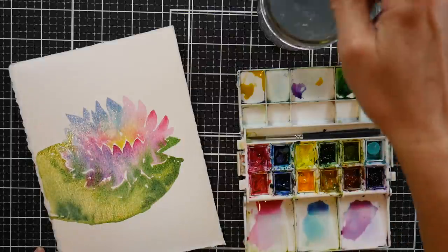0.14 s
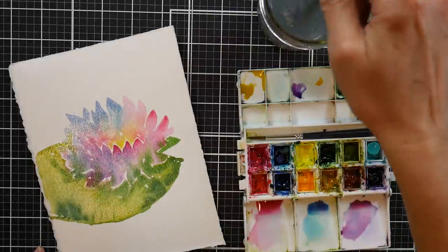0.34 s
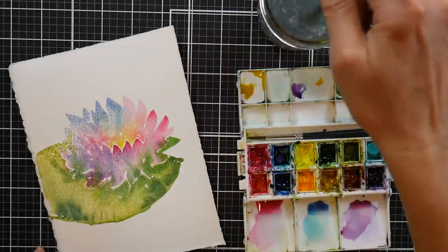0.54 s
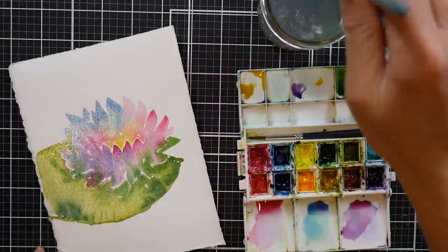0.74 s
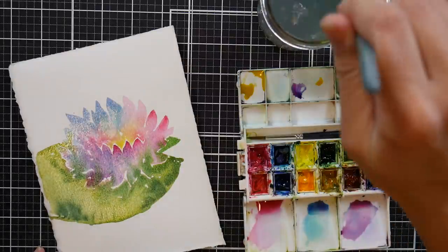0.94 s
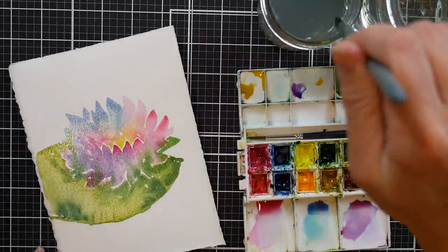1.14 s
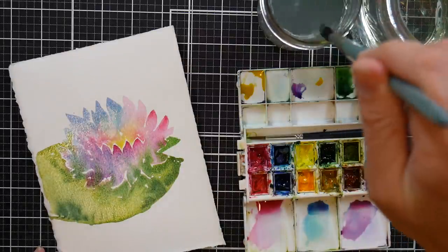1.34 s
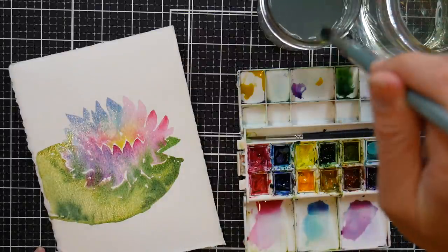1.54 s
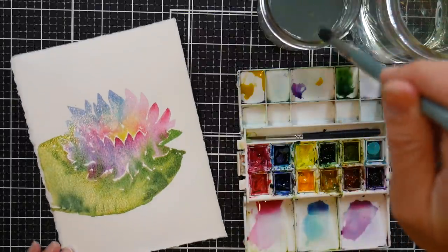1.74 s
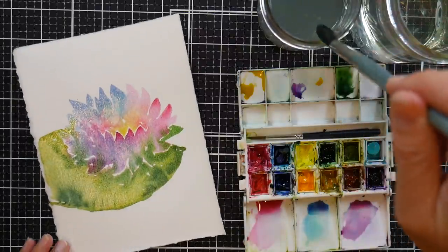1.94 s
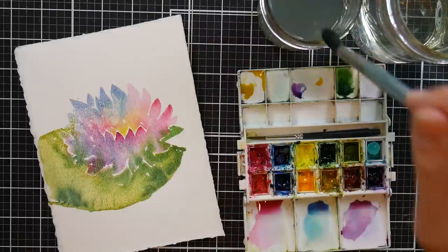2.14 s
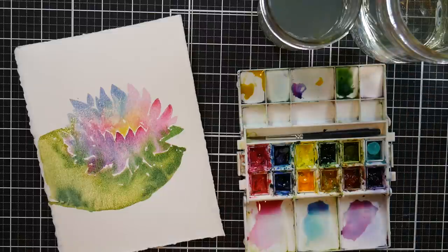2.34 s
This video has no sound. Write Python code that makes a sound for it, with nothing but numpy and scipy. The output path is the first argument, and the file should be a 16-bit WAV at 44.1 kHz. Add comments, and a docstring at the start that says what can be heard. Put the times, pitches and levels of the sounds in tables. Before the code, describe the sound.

A paintbrush is rinsed in a glass jar, splashing briefly and clinking against the sides. After one more clink, the handle clicks lightly on the rim and the wet bristles are softly wiped, close by in a small room.

```python
"""Rinsing a paintbrush in a jar

A brush is swished in a glass jar of water on an art table in a small room. It knocks about in the water, whips
up bubbles and drops, strikes the glass into its normal modes and shakes the table. Then the handle clicks
lightly on the rim, and the wet bristles hiss as they are wiped off four times."""
import sys
import numpy as np
from scipy import signal
from scipy.fft import rfft, irfft, next_fast_len
from scipy.io import wavfile
from scipy.ndimage import uniform_filter1d

SR = 44100
rng = np.random.default_rng(int(sys.argv[2]) if len(sys.argv) > 2 else 0)


def inscribe(sig):
    """Save sig as 16-bit PCM at rate SR to the path in sys.argv[1].

    A 1-D sig is mono; a 2-D sig holds one channel per row.
    Samples are clipped to [-1, 1] before scaling.
    """
    pcm = np.round(np.clip(np.atleast_2d(sig).T, -1, 1) * 32767)
    wavfile.write(sys.argv[1], SR, pcm.astype(np.int16))


N = 105487
TIME = np.arange(N) / SR
AGE = TIME[:SR // 2]  # seconds since an excitation
SHARP_ATTACK_S = 0.00015
# Strength of the stirring. Each row: time in seconds, level in dB.
STIRRING = [(0.04, -98), (0.075, -46.5), (0.2, -41.5), (0.3, -45), (0.4, -51), (0.5, -67), (0.68, -78),
            (0.8, -95.5)]


def from_db(db):
    """Decibels to amplitude ratio."""
    return 10 ** (np.asarray(db) / 20)


def rms_one(x):
    """Normalisation to unit rms."""
    return x / np.sqrt(np.mean(x ** 2) + 1e-20)


def at_hz(points, hz):
    """Interpolation on a logarithmic frequency axis."""
    frequencies, values = np.transpose(points)
    return np.interp(np.log(hz + 1), np.log(frequencies), values)


def add(out, start, sound):
    """Superposition of a sound from its start in seconds."""
    i = max(int(start * SR), 0)
    out[i:i + len(sound)] += sound[:N - i]


def fade(t60, size=len(AGE)):
    """Exponential decay by 60 dB in t60 seconds."""
    return np.exp(-np.log(1000) * AGE[:size] / t60)


def ping(hz, t60, attack_s, size=len(AGE)):
    """A damped oscillation with a smooth onset."""
    age = AGE[:size]
    onset = 1 - np.exp(-np.minimum(age / attack_s, 10) ** 2)
    return np.sin(2 * np.pi * hz * age) * fade(t60, size) * onset


def pings(rows, attack_s):
    """Superposition of damped oscillations, one for each row."""
    out = np.zeros(N)
    for start, hz, db, t60 in rows:
        add(out, start, from_db(db) * ping(hz, t60, attack_s, size=int(2 * t60 * SR)))
    return out


def burst(spectrum, t60, size=2048):
    """An impact transient: spectrally shaped noise in exponential decay."""
    gain = from_db(at_hz(spectrum, np.fft.rfftfreq(size, 1 / SR)))
    noise = irfft(rfft(rng.standard_normal(size)) * gain, size)
    return rms_one(noise) * fade(t60, size)


def wide_noise(spectrum, size):
    """Shaped stereo noise, partially coherent between the ears as a room's field is."""
    # Each row: frequency in Hz, left-right coherence.
    coherence = [(60, 0.2), (140, 0.3), (300, 0.1), (700, 0.13), (1400, 0.53), (2500, 0.84), (6000, 0.38),
                 (12000, 0.63)]
    n = next_fast_len(size)
    hz = np.fft.rfftfreq(n, 1 / SR)
    alike = np.clip(at_hz(coherence, hz), -.99, .99)
    mid, side = rfft(rng.standard_normal((2, n)))
    ears = np.sqrt(1 + alike) * mid + np.sqrt(1 - alike) * side * [[1], [-1]]
    return rms_one(irfft(ears * from_db(at_hz(spectrum, hz)), n)[:, :size])


def grain(depth_db, size):
    """Random amplitude modulation, smoothed over size samples."""
    flutter = rms_one(uniform_filter1d(rng.standard_normal(N), size))
    return rms_one(from_db(depth_db * flutter))


def room_tone():
    """Stationary background: broadband noise and a faint pure-tone hum."""
    # Each row: frequency in Hz, relative level in dB.
    spectrum = [(25, -27), (60, -14), (100, -12), (140, -9), (240, -5.5), (330, -16), (500, -11.5),
                (900, -17.5), (1600, -20), (3600, -25), (7300, -26), (12000, -29.5), (16000, -33)]
    noise_db, hum_db, hum_hz = -63.5, -74, 120
    hum = from_db(hum_db) * np.sin(2 * np.pi * hum_hz * TIME)
    return from_db(noise_db) * wide_noise(spectrum, N) + hum


def splashing():
    """Stirred water radiates fluttering noise whose envelope follows the stirring."""
    # Each row: frequency in Hz, relative level in dB.
    spectrum = [(40, -23.5), (120, -12), (270, -2.5), (480, -6.5), (670, 4), (850, -14.5), (1150, 10.5),
                (2400, 0.5), (3600, -16), (6300, -12), (10000, -15), (16000, -32)]
    envelope = from_db(np.interp(TIME, *np.transpose(STIRRING)))
    return envelope * grain(depth_db=6, size=130) * wide_noise(spectrum, N)


def bubbles():
    """Each bubble is a damped resonator; stronger stirring excites it more."""
    per_second, low_hz, high_hz, t60_cycles = 700, 1167, 10900, 18
    boost_db, db_per_octave, spread_db = 5, -7, 2
    times, levels = np.transpose(STIRRING)
    jitter, pitch, strength = rng.random((600, 3)).T
    start = times[0] + (np.arange(len(jitter)) + jitter) / per_second
    hz = low_hz * (high_hz / low_hz) ** pitch
    db = np.interp(start, times, levels) + boost_db + db_per_octave * np.log2(hz / low_hz)
    db += spread_db * np.minimum(-np.log(1 - strength), 2)
    rows = np.transpose([start, hz, db, t60_cycles / hz])
    return pings(rows[start < times[-1]], SHARP_ATTACK_S)


def droplets():
    """Each flying drop excites a brief, high damped oscillation."""
    # Each row: start in seconds, frequency in Hz, level in dB, t60 in seconds.
    drops = [(0.0437, 3240, -41.5, 0.03), (0.0437, 5960, -38.5, 0.023), (0.0445, 9800, -37.5, 0.0072),
             (0.065, 7100, -40, 0.022), (0.070, 5600, -28.5, 0.008), (0.1605, 6450, -42, 0.058),
             (0.183, 4550, -28, 0.006), (0.1912, 4540, -28, 0.015), (0.1915, 5800, -30.5, 0.011),
             (0.227, 5140, -36.5, .015), (0.229, 6110, -36.5, 0.019), (0.324, 3900, -52, 0.016),
             (0.434, 8500, -48, 0.0091), (0.5055, 9350, -42, 0.0034), (0.5305, 4970, -29.5, 0.0054),
             (0.5308, 6800, -29.5, 0.004), (0.5308, 10230, -39.5, 0.0049), (0.542, 4660, -39, 0.025),
             (0.6035, 6340, -41.5, 0.012), (0.6157, 10770, -35.5, 0.0046), (0.6157, 14600, -29.5, 0.001),
             (1.106, 8500, -47, 0.006), (1.110, 10900, -44, 0.0037), (2.001, 8500, -58, .03)]
    return pings(drops, SHARP_ATTACK_S)


def brush_knocks():
    """The brush excites hollow, quickly damped resonances of the water-filled jar."""
    # Each row: start in seconds, frequency in Hz, level in dB, t60 in seconds.
    knocks = [(0.064, 1096, -29.5, 0.072), (0.068, 2200, -9, 0.0039), (0.0790, 1930, 0, 0.0072),
              (0.0805, 1049, -33, 0.12), (0.084, 2136, -31.5, .16), (0.152, 2470, -28, 0.025),
              (0.1605, 2060, -20.5, 0.015), (0.1776, 1162, -23, 0.036), (0.1778, 1514, -16, .012),
              (0.178, 2680, -22, 0.0079), (0.189, 1141, -23.5, 0.054), (0.2448, 1816, -22, .014),
              (0.2596, 1830, -6, 0.015), (0.3225, 1640, -26.5, 0.026), (0.3228, 2870, -35, 0.028),
              (0.334, 2547, -33, 0.071), (0.324, 1144, -36, 0.056), (0.3435, 1690, -23.5, 0.026),
              (0.3586, 1525, -4, 0.013), (0.367, 1408, -20, 0.042), (0.392, 1400, -36.5, 0.049),
              (0.421, 1557, -36.5, 0.094), (0.5175, 2400, -38.5, 0.0096), (0.5206, 1974, -12, 0.0057),
              (0.531, 1633, -23.5, 0.016), (0.533, 1198, -43.5, .04), (0.7785, 1615, -31, .012),
              (0.7785, 3180, -31, 0.014)]
    return pings(knocks, attack_s=0.00077)


def glass_taps():
    """Impacts excite the jar's normal modes, weighted by where the brush lands."""
    # Each row: start in seconds, ring level in dB, relative levels in dB of the lowest mode,
    # the second mode and the free ring, then the level of the contact crack in dB.
    taps = [(0.0791, -20, -3, 2, -9.5, -22), (0.184, -38.5, 3.5, -5, -1, -61),
            (0.2439, -55, 0.5, 15, -18, -39.5), (0.2591, -29.5, -13, -1, -27, -29),
            (0.3580, -29.5, 7, -0.5, -15.5, -25.5), (0.450, -51.5, -8, -1, -6, -63),
            (0.7783, -24.5, 5, -12, -10.5, -31), (0.7819, -33.5, 8.5, -9, -10.5, -43.5),
            (0.8561, -57, 20, -4, -4.5, -60)]
    # Each row: frequency in Hz, level in dB, t60 in seconds.
    modes = [(2551.6, -5.5, 0.21), (5974, -7.5, .16), (6360, -5, 0.018), (8524, -6, .14),
             (10060, -16.5, 0.031), (10220, -15.5, .04), (11280, -19.5, .035)]
    # Each row: frequency in Hz, relative level in dB.
    crack_spectrum = [(50, -1.5), (150, 3), (400, 0.5), (750, -9), (1200, -1.5), (2600, 3.5), (4000, -10.5),
                      (6300, -19), (9500, -4.5), (12500, -22.5), (16000, -30)]
    contact_s = 0.0024  # the brush damps the first swing; the rest rings on
    out = np.zeros(N)
    lowest, second, *upper = [from_db(db) * ping(hz, t60, SHARP_ATTACK_S) for hz, db, t60 in modes]
    for start, db, lowest_db, second_db, free_db, crack_db in taps:
        ring = from_db(lowest_db) * lowest + from_db(second_db) * second + sum(upper)
        damping = np.exp(-AGE / contact_s) + from_db(free_db)
        add(out, start, from_db(db) * ring * damping)
        add(out, start, from_db(crack_db) * burst(crack_spectrum, t60=0.018))
    return out


def table_thuds():
    """The table top is a soundboard: each push on the jar excites low modes and a rumble."""
    # Each row: start in seconds, level in dB.
    pushes = [(0.081, -40.5), (0.185, -49.5), (0.26, -39.5), (0.366, -52), (0.444, -51.5), (0.548, -59.5),
              (0.791, -56), (1.19, -53), (1.79, -55), (2.172, -56.5)]
    # Each row: frequency in Hz, level in dB, t60 in seconds.
    modes = [(135, 4.5, 0.065), (146.2, 18.5, 0.1), (245, -5.5, 0.087)]
    # Each row: frequency in Hz, relative level in dB.
    rumble_spectrum = [(30, -26.5), (80, -15), (140, 0), (180, -5.5), (260, 0), (330, -3.5), (500, -5),
                       (800, -24), (3000, -57.5)]
    out = np.zeros((2, N))
    boom = sum(from_db(db) * ping(hz, t60, attack_s=0.025) for hz, db, t60 in modes)
    envelope = from_db(-3) * fade(t60=0.24) * (1 - np.exp(-AGE / .004))
    for start, db in pushes:
        rumble = envelope * wide_noise(rumble_spectrum, len(AGE))
        for ear, shake in zip(out, rumble):
            add(ear, start, from_db(db) * (boom + shake))
    return out


def handle_clicks():
    """Impact on the rim: a bright tick, then the damped modes of the hand-held handle."""
    # Each row: start in seconds, level in dB, the tick's offset in dB.
    clicks = [(0.7918, -29.5, 0), (1.0428, -46, -7.5), (1.0719, -34, -4), (1.1823, -32.5, -2),
              (1.2979, -33.5, -17), (1.3225, -30, 0.5), (1.3675, -42, -9), (1.3967, -32.5, -0.5),
              (1.5220, -36.5, -18.5), (1.5465, -30, 1.5), (1.6201, -35.5, -1.5), (1.7200, -45, -11),
              (1.7501, -36, 1.5), (1.8467, -38.5, -1), (1.9139, -44.5, -12), (1.9463, -38.5, -8),
              (2.0295, -38, -15), (2.101, -42, -8), (2.1297, -33.5, -2)]
    # Each row: frequency in Hz, level in dB, t60 in seconds.
    modes = [(249.3, -32.5, 0.22), (432, -24.5, 0.012), (956, -4.5, 0.0046), (1315, 8.5, 0.0038),
             (2220, -26.5, 0.0017)]
    # Each row: frequency in Hz, relative level in dB.
    tick_spectrum = [(300, -21.5), (2200, 4.5), (2900, -2.5), (3500, 0.5), (4200, -9.5), (4800, -1.5),
                     (5300, -4), (6100, 3), (6800, -8.5), (7500, -10.5), (8400, -6), (11000, -11),
                     (16000, -32)]
    body_lag_s, tick_db = 0.00039, -12.5
    out = np.zeros(N)
    body = sum(from_db(db) * ping(hz, t60, attack_s=0.00027) for hz, db, t60 in modes)
    for start, db, treble_db in clicks:
        add(out, start + body_lag_s, from_db(db) * body)
        add(out, start, from_db(db + treble_db + tick_db) * burst(tick_spectrum, t60=0.015))
    return low_cut(out, hz=130)


def bristle_wipes():
    """Friction of bristles on the rim makes a grainy hiss and a resonant rasp."""
    # Each row: start and length in seconds, level in dB, attack and release constant in seconds.
    wipes = [(1.745, 0.073, -52.5, .003, 0.047), (1.983, 0.16, -65.5, 0.034, 0.032),
             (2.133, 0.066, -59, 0.025, 0.084), (2.299, 0.023, -71, 0.016, 0.025)]
    # Each row: frequency in Hz, relative level in dB.
    hiss_spectrum = [(50, -20.5), (150, -4), (450, 7), (600, 0), (1200, 0.5), (2600, -1.5), (3200, -0.5),
                     (3900, -7), (5300, -8), (7500, -7), (9500, -5.5), (14000, -22), (16000, -40)]
    # Each row: centre and bandwidth in Hz, level relative to the hiss in dB.
    resonances = [(3160, 370, -11.5), (5400, 950, -9)]
    envelope, rasp = np.zeros((2, N))
    for start, length, db, attack, release in wipes:
        rise = np.clip((TIME - start) / attack, 0, 1)
        fall = np.exp(-np.maximum(TIME - start - length, 0) / release)
        envelope += from_db(db) * rise * fall
    for hz, width, db in resonances:
        resonator = signal.iirpeak(hz, hz / width, fs=SR)
        rasp += from_db(db) * rms_one(signal.lfilter(*resonator, rng.standard_normal(N)))
    return envelope * grain(depth_db=1.5, size=40) * (wide_noise(hiss_spectrum, N) + rasp)


def low_cut(x, hz, order=2):
    """A high-pass filter rolls off the bass."""
    return signal.sosfilt(signal.butter(order, hz, "high", fs=SR, output="sos"), x + 1e-18)


def near_echoes(x):
    """Specular reflection: delayed copies off the table top and the things on it."""
    # Each row: delay in seconds, left gain, right gain.
    echoes = [(.0022, 0.06, 0.37), (.0052, 0.092, 0.061), (.0085, 0.079, 0.057), (0.0123, 0.094, .11)]
    return sum(np.array([[left], [right]]) * np.interp(TIME - delay, TIME, x, left=0)
               for delay, left, right in echoes)


def reverberation(x):
    """Convolution with the room's impulse response: dense early reflections, then a tail."""
    # Each row: frequency in Hz, relative level of the reflections in dB.
    spectrum = [(100, -11), (250, 18), (500, 1), (1000, 1), (2000, -6), (4000, -5.5), (9000, -4),
                (16000, 4)]
    early = from_db(-0.5) * rms_one(fade(t60=0.15))
    late = from_db(-8.5) * rms_one(fade(t60=0.33))
    onset = np.clip(AGE / .002 - 1, 0, 1)  # silent for the first 2 ms
    response = wide_noise(spectrum, len(AGE)) * (early + late) * onset / np.sqrt(len(AGE))
    return signal.fftconvolve(x[None], response, axes=1)[:, :N]


def scene():
    """Direct sound from the jar, a little to the right, adds to its reflections and the other sources."""
    water_rings = low_cut(bubbles() + droplets() + brush_knocks(), hz=970, order=6)
    jar = low_cut(water_rings + glass_taps(), hz=520)  # small bodies radiate little bass
    jar += handle_clicks()
    background = room_tone()
    direct = jar * from_db([[-0.5], [0.5]])
    reflected = near_echoes(jar) + reverberation(jar)
    return direct + reflected + table_thuds() + bristle_wipes() + splashing() + background


def record(dry):
    """Band limiting: an elliptic low-pass filter cuts the top steeply."""
    cutoff_hz = 15800
    return signal.sosfilt(signal.ellip(10, .2, 70, cutoff_hz, fs=SR, output="sos"), dry)


dry = scene()
out = record(dry)
inscribe(out)
```